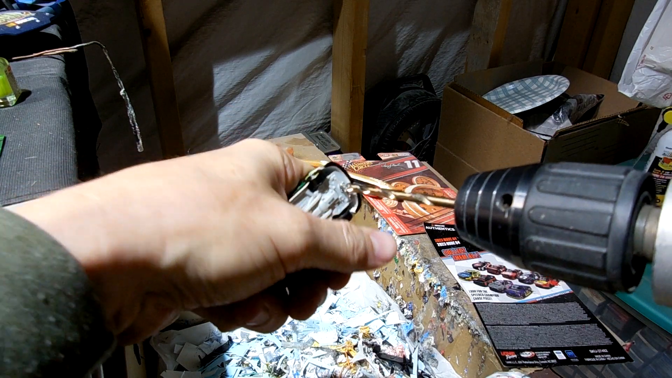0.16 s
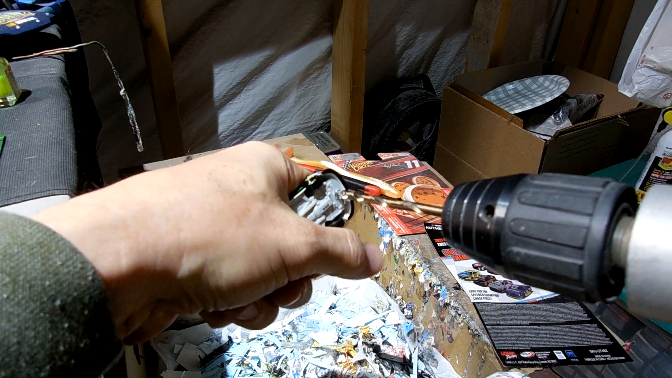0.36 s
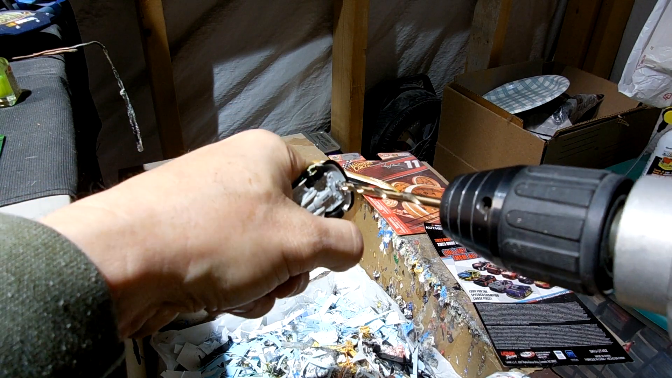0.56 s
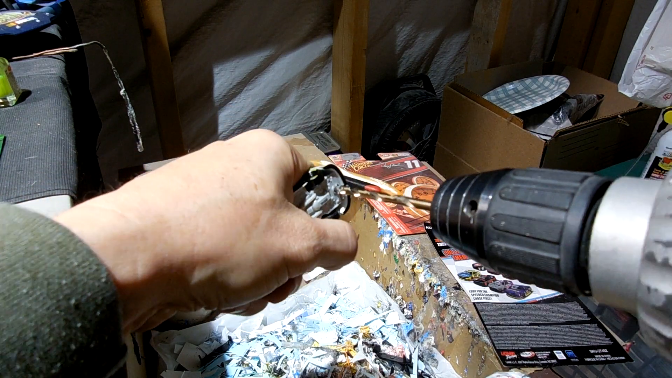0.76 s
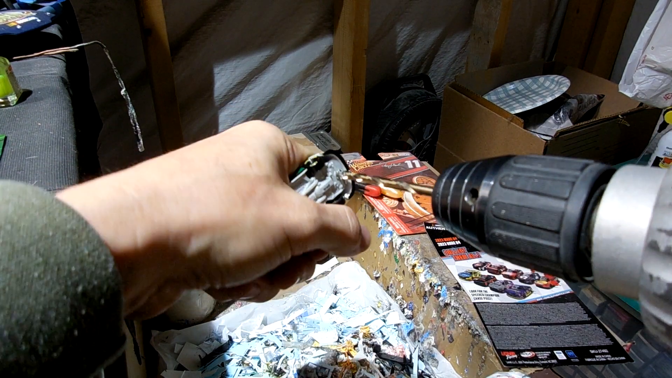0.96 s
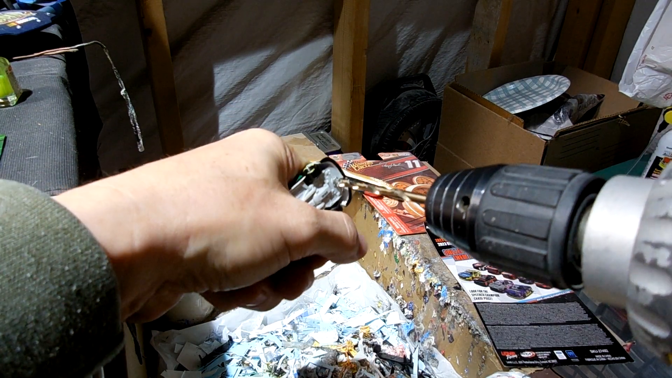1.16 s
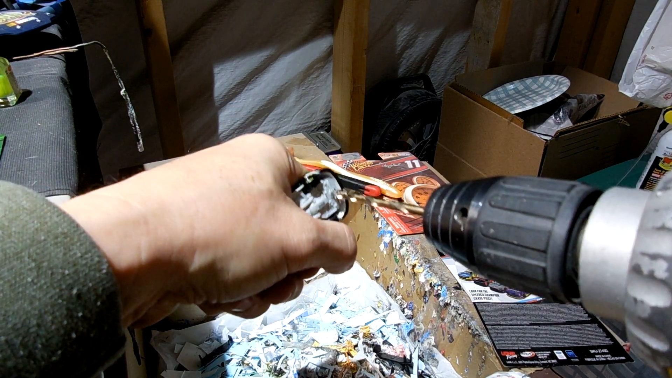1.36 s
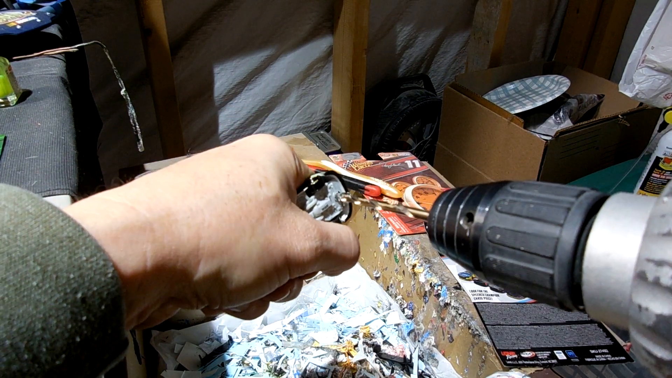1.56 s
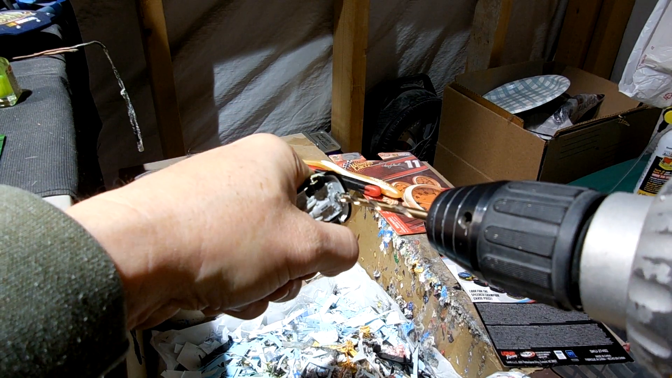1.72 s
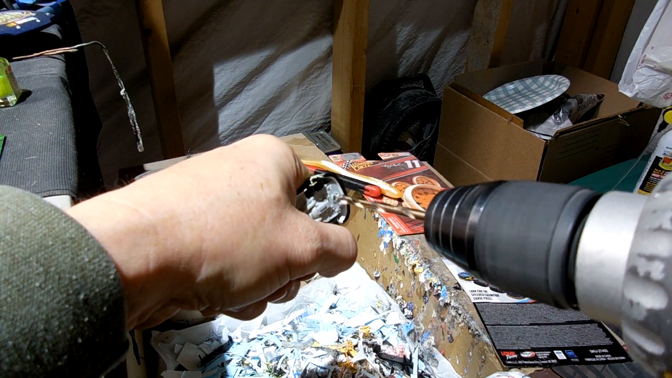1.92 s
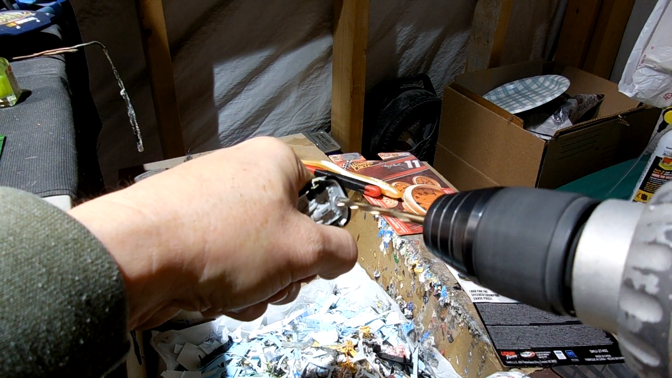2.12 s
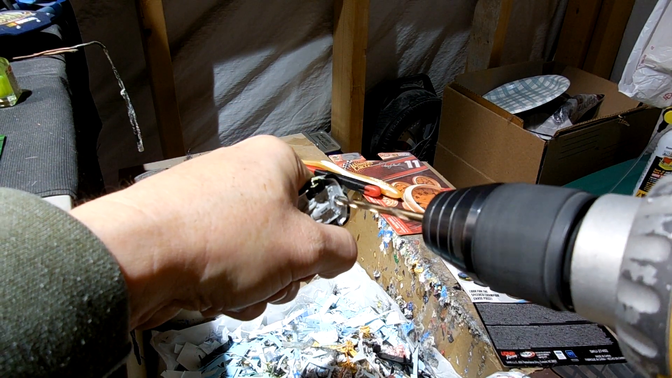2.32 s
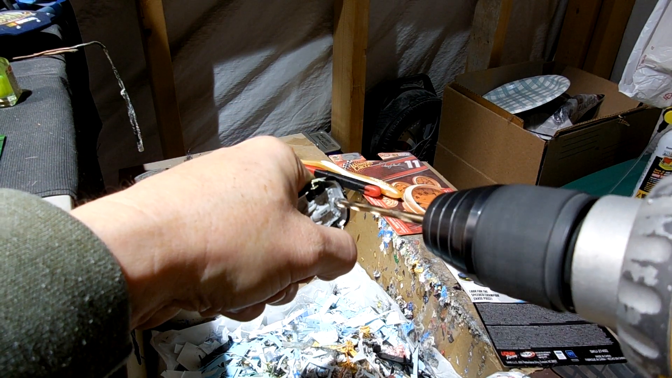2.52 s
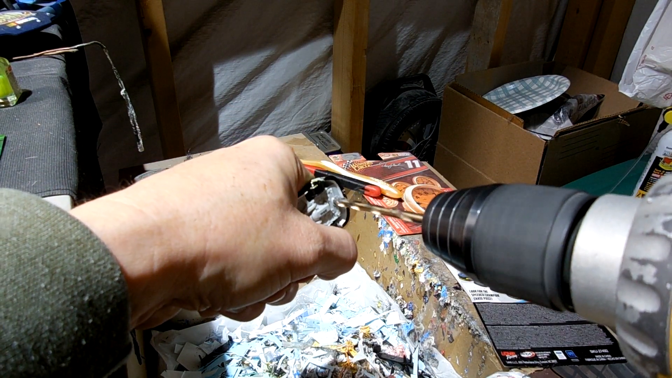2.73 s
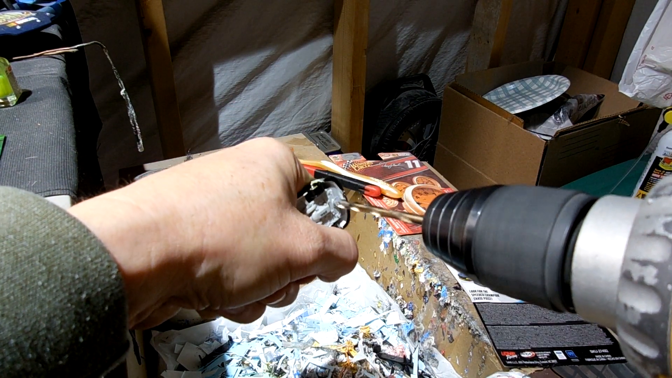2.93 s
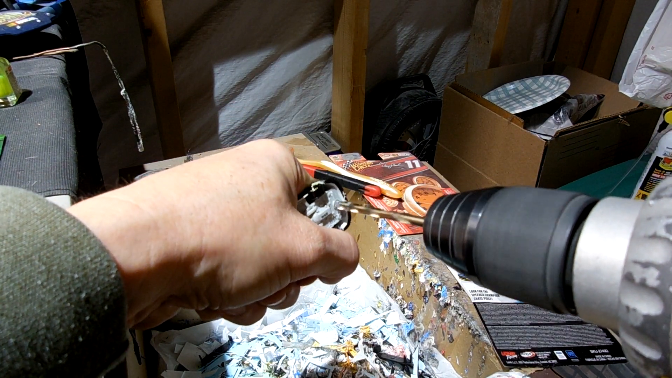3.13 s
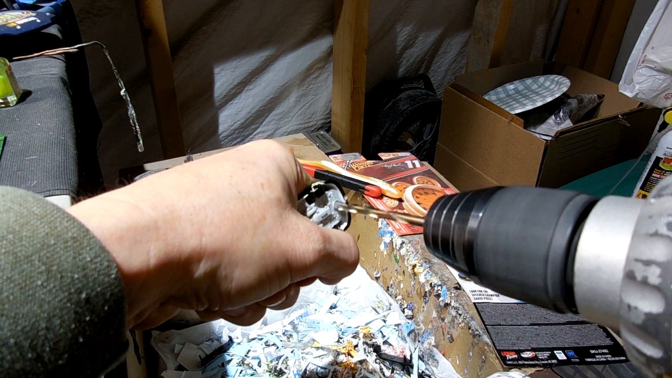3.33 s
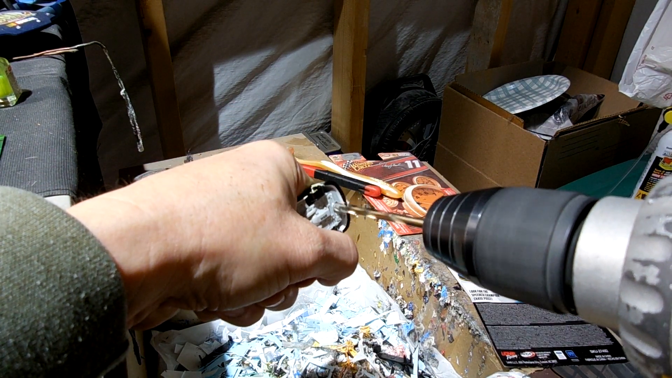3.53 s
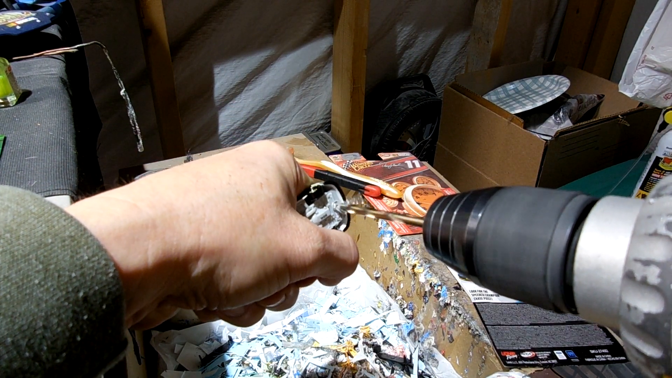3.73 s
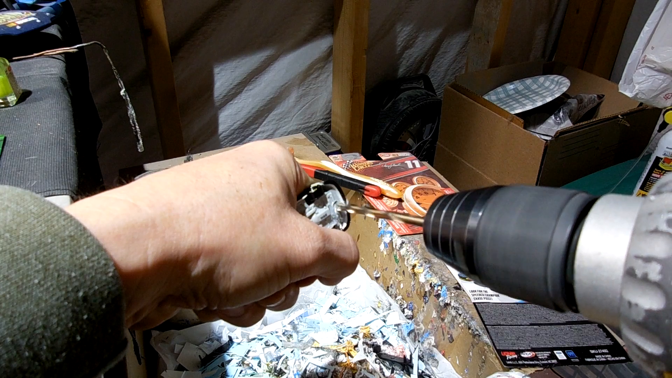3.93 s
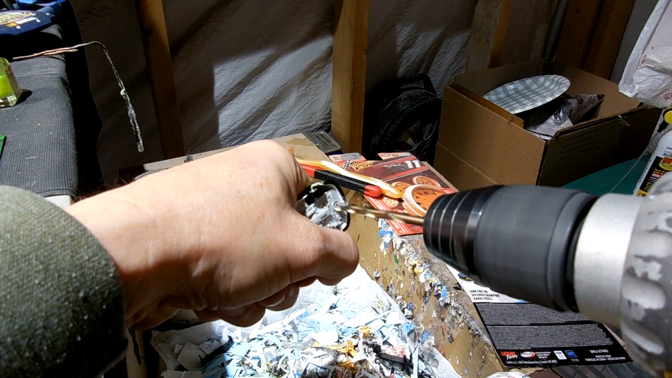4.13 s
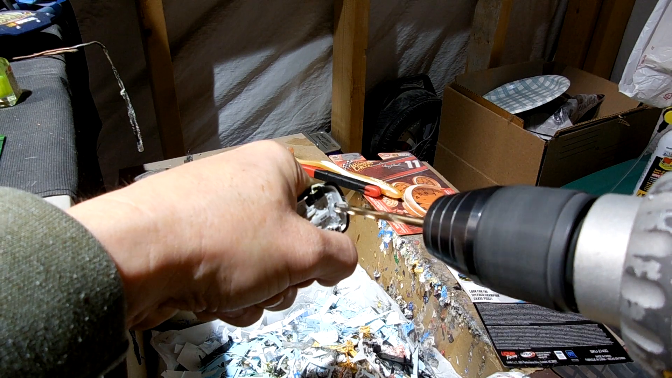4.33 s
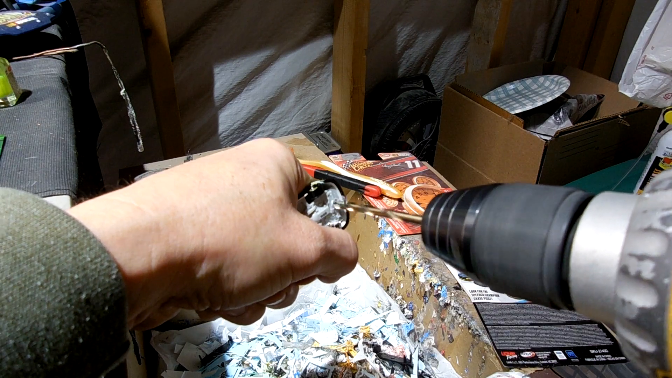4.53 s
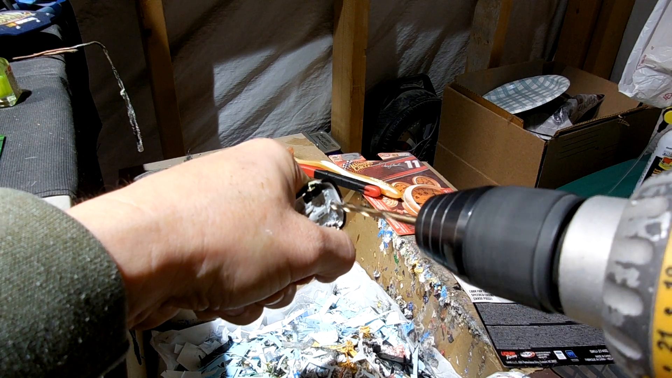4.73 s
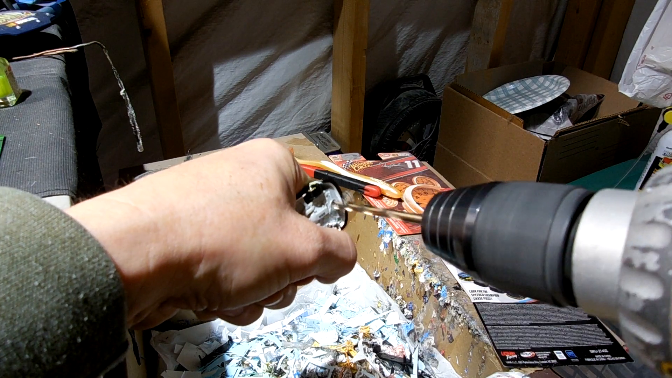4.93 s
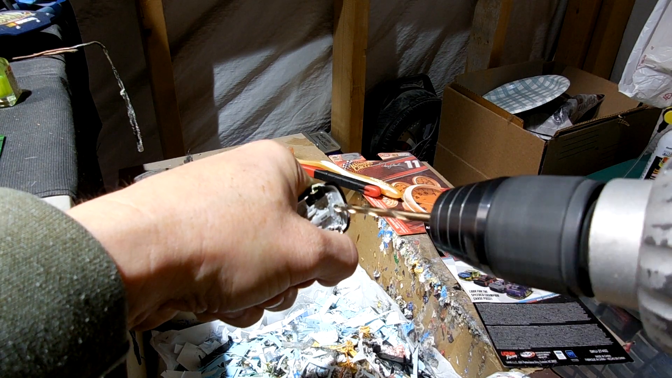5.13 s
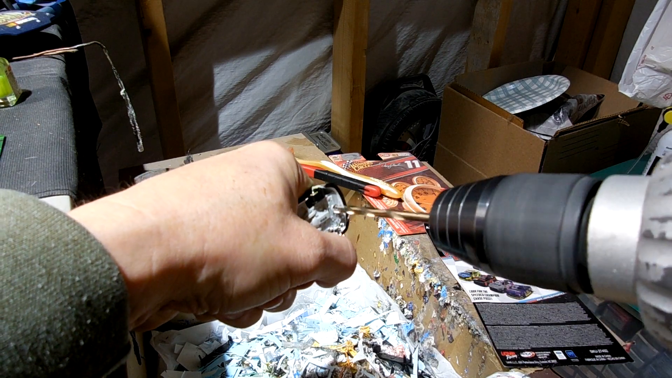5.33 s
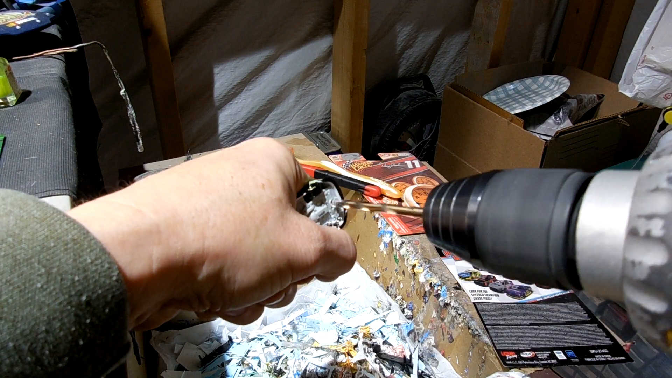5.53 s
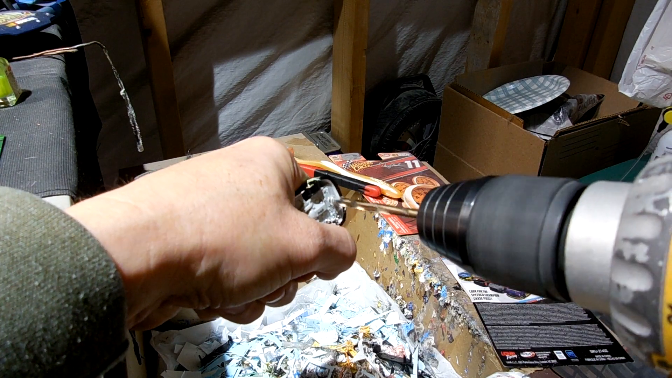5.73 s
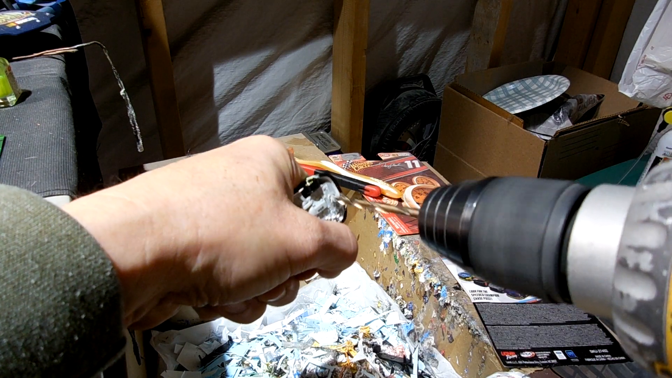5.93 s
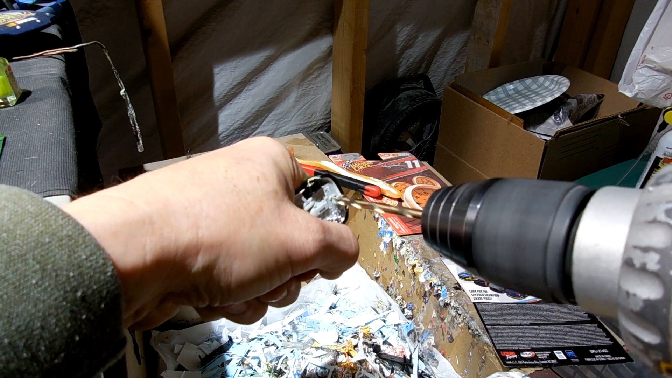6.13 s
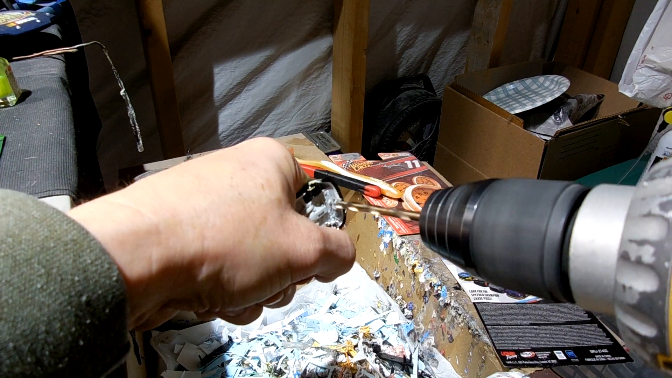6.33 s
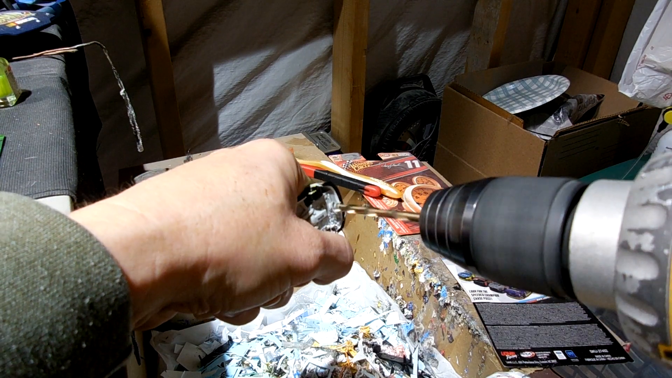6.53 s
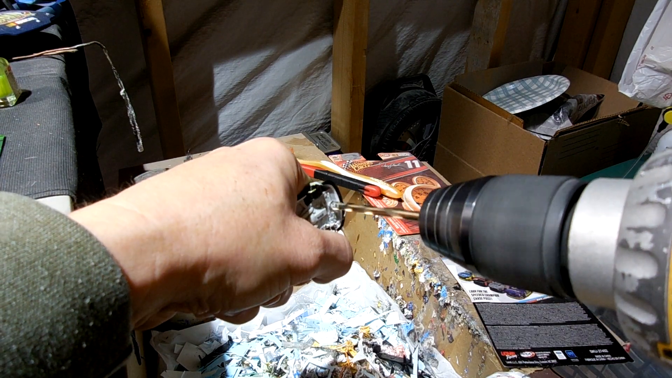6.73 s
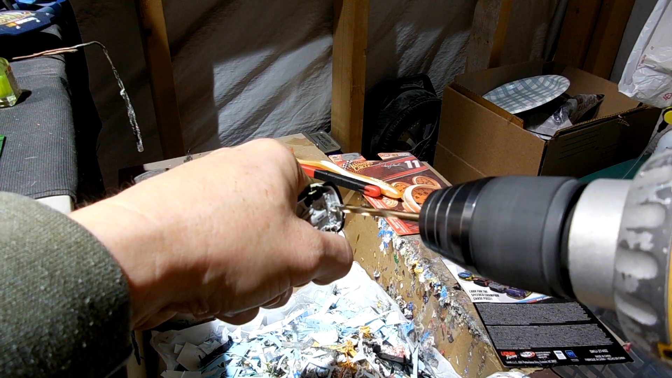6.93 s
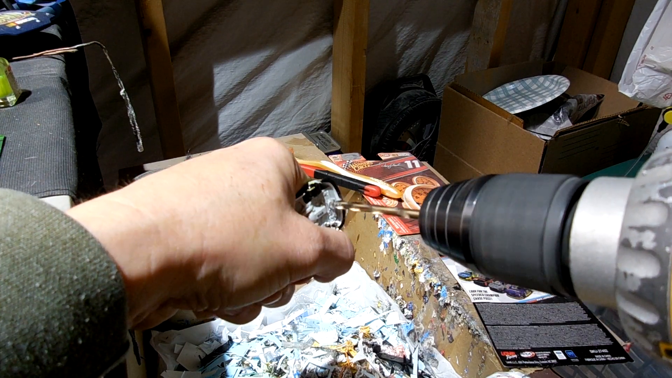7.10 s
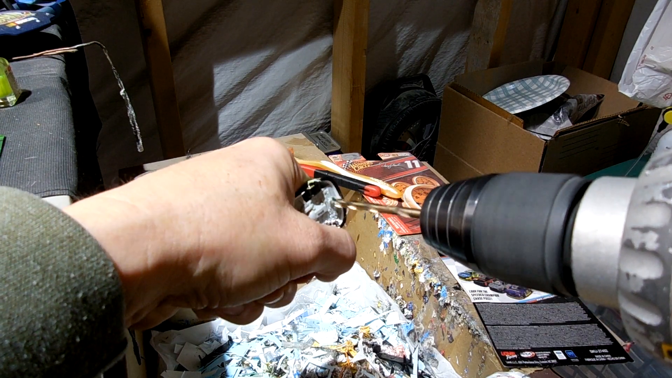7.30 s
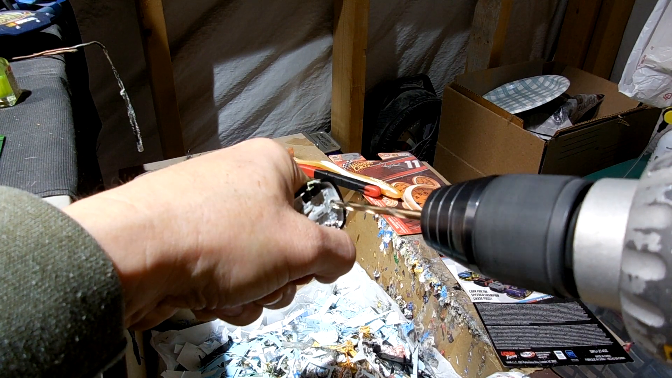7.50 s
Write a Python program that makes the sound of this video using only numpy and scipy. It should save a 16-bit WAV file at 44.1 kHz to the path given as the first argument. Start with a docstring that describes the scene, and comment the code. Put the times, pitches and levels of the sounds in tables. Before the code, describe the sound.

Light clicks and rubs of a handled toy truck, then a cordless drill starts abruptly and bores steadily with a whine and bright hiss.

```python
"""Cordless drill boring a rivet

In a quiet, faintly humming shed a hand shifts a small toy truck: clicks, rubs, scrapes and a thump.
Then a drill, close to a two-port microphone, starts and bores into one of the truck's rivets.
Its motor and gears whine at multiples of the shaft speed, its speed control whistles at a fixed
chopping rate, and its brushes, fan and bit hiss, coloured by the housing and bright at the top."""
import sys
import numpy as np
from scipy import signal
from scipy.fft import rfft, irfft
from scipy.io import wavfile
from scipy.ndimage import uniform_filter1d

SR = 44100
rng = np.random.default_rng(int(sys.argv[2]) if len(sys.argv) > 2 else 0)


def master(y):
    """Save y as 16-bit WAV."""
    cut = np.clip(np.atleast_2d(y).T, -1, 1)
    pcm = np.round(cut * 32767)  # scale
    wavfile.write(sys.argv[1], SR, pcm.astype(np.int16))


N = 333396
T = np.arange(N) / SR
F = np.maximum(np.arange(N // 2 + 1) * SR / N, 1)

# running speed of the motor as the hand presses and eases: (time [s], speed [Hz])
SHAFT_SPEED = [(2.05, 362), (2.26, 408), (2.56, 459), (2.7, 460), (3.31, 421), (3.76, 435), (3.95, 434),
               (4.3, 448), (4.66, 440), (4.96, 436), (5.12, 445), (5.56, 420), (5.84, 427), (6.03, 417),
               (6.48, 418), (7.06, 407), (7.22, 410), (7.56, 406)]
# weaker gear lines: (frequency [cycles per shaft turn])
GEAR_ORDERS = [.141, 1, 1.24, 1.38, 1.53, 1.6, 2, 2.07, 2.25, 2.62, 3.336, 4, 4.15, 4.54, 6, 6.25]
# those lines in a light cut and in a heavy cut: (relative level [dB])
GEAR_LIGHT_DB = [-36, -21, -32, -27, -29, -22, -19, -21, -23, -22, -16, -19, -19, -14, -13, -17]
GEAR_HEAVY_DB = [-40, -28, -36, -30, -30, -33, -19, -24, -23, -26, -30, -27, -27, -24, -17, -18]
# commutator line with sidebands, -3 to +3 chuck rates away: (light cut [dB], heavy cut [dB])
COMMUTATOR_LINES = [(-15, -23), (-11, -22), (-7, -16), (-3, 0), (-4, -11), (-9, -12), (-15, -23)]
# whistle lines: (multiple of chopping rate [1], multiple of shaft speed added [1])
CHOP_LINES = [(1, 0), (1, -1), (1, 2), (2, 0), (2, -1), (2, 1), (2, -3), (3, 0), (4, 0)]
# all of those lines but the first: (level [dB])
CHOP_LINE_DB = [-45, -48, -35.5, -35.5, -44, -45, -47.5, -44]
# the first line, shifting as the drill tilts: (time [s], left level [dB], right level [dB])
WHISTLE_LEVELS = [(2.15, -18, -17), (2.75, -16.5, -17), (3.05, -22, -17.5), (3.35, -17.5, -18),
                  (4.5, -18.7, -18.2), (4.9, -16.5, -18.7), (5.12, -18.5, -19), (5.36, -27, -22.3),
                  (5.55, -25.5, -24), (5.93, -17, -21), (6.2, -17.2, -18.7), (6.45, -18.3, -20.3),
                  (6.8, -20, -23.8), (7.15, -20.3, -24), (7.5, -19.5, -22.5)]
# brushes, fan and bit: (frequency [Hz], relative spectral level [dB])
HISS_SPECTRUM = [(30, -47), (250, -34), (430, -30), (750, -26), (1100, -16), (1300, -7.5), (1500, -13.5),
                 (2200, -18.5), (3700, -11.5), (4300, -15.5), (7700, -16.5), (11500, -19), (14500, -22.5),
                 (16500, -23)]
# peaks in the drill's hiss: housing resonances, plus a lift of the top treble:
# (frequency [Hz], width [Hz], boost [dB])
HISS_PEAKS = [(320, 52, 3.5), (620, 58, 6.5), (876, 104, 5), (1965, 350, 5.5), (2657, 400, 8.5),
              (3260, 400, 3), (5760, 280, 4), (6480, 390, 5), (7900, 750, 0.5), (14200, 1700, 7.5),
              (15600, 620, 5)]
# balance of whine and hiss: (frequency [Hz], left minus right [dB])
DRILL_BALANCE = [(60, 0), (200, -2), (1290, 0), (2100, 2), (2500, -2.5), (3100, -0.5), (4100, -0.5),
                 (5800, 10.5), (7100, 6), (8300, 9), (9700, 4.5), (11500, 3), (13000, 5.5), (15000, -2)]
# hiss common to both ports: (frequency [Hz], share of power [0-1])
COHERENT_SHARE = [(60, .7), (300, .99), (650, .97), (1000, .75), (1300, .95), (2100, .55), (2700, .8),
                  (3050, .3), (3600, .6), (4500, .3), (6500, .55), (7400, .2), (9000, .42), (14000, .45)]
# the bench as the drill starts and the hand leans: (start [s], rise [s], t60 [s], level [dB])
BENCH_RUMBLES = [(2.05, .03, 2.6, -48), (4.9, .2, 3.2, -54)]
# gearbox resonances: (frequency [Hz], t60 [s], level [dB])
GEARBOX_MODES = [(335, .07, -24), (640, .04, -28), (1480, .06, -22), (1900, .04, -26), (3300, .04, -24)]
# knocks on the truck: (time [s], level [dB], snap [Hz], low modes [dB], middle modes [dB],
# high modes [dB], left minus right [dB])
TRUCK_CLICKS = [(0.132, -38, 907, -19, -14, -17, 3.0), (0.265, -32.5, 960, -8, -20, -23, 5.5),
                (0.28, -37, 900, 1, -15, -19, 4.0), (0.312, -31.5, 4670, -20, -13, -20, 4.5),
                (0.359, -43, 1200, -9, -15, -15, 1.5), (0.43, -31.5, 4140, -20, -3, -18, 6),
                (0.845, -30.5, 5200, -19, -10, -9, 9), (0.848, -36, 4940, -13, -14, -16, 5.0),
                (1.238, -49, 1100, -11, -12, -11, 3.0), (1.349, -42, 880, -5, -17, -16, 10),
                (1.438, -22.5, 8150, -35, -27, -2, 7), (1.451, -43, 736, -19, -19, -24, 4.0),
                (1.498, -39, 3900, -18, -8, -21, 11), (1.657, -29.5, 1620, -31, 17, -30, 5.0),
                (1.667, -47, 756, -15, -12, -11, 3.0), (1.714, -42, 1110, -10, -12, -19, 1.5),
                (1.756, -54, 732, -15, -17, -14, 1.5), (1.808, -30.5, 3400, -18, -2, -23, 6),
                (1.919, -29.5, 1540, -39, 6, -8, 5)]
# truck resonances: (frequency [Hz], t60 [s])
TRUCK_MODES = [(900, .018), (1500, .018), (2400, .02), (3400, .012), (4700, .012), (5600, .008),
               (6900, .006), (8400, .008), (10500, .005)]
# strokes of skin and sleeve: (start [s], rise [s], hold [s], fall [s], level [dB])
RUB_STROKES = [(.22, .06, .01, .1, -53), (.58, .04, .2, .05, -58), (.8, .1, .25, .025, -49.5),
               (1.2, .2, .01, .1, -54), (1.45, .05, .22, .06, -60)]
# their friction noise: (frequency [Hz], relative spectral level [dB])
RUB_SPECTRUM = [(470, -44), (800, -12), (1110, -6), (1260, -12), (1440, -6), (2900, -1.5), (11000, -12.5),
                (15000, -28)]
# short scrapes: (centre time [s], 1/e half-width [s], level [dB])
SCRAPE_STROKES = [(.665, .02, -52), (0.736, 0.021, -50.5)]
# resonances they excite: (frequency [Hz], width [Hz], relative level [dB])
SCRAPE_MODES = [(2000, 250, 0), (2450, 250, 0), (3330, 200, 2), (4900, 400, -6)]
# thump through the bench: (start [s], frequency [Hz], rise [s], t60 [s], level [dB])
THUMP_MODES = [(.966, 300, .008, .07, -32), (.978, 135, .004, .25, -35), (.985, 45, .01, .5, -41)]
# air and microphone hiss: (frequency [Hz], relative spectral level [dB])
SHED_SPECTRUM = [(12, -30), (20, 1), (146, -7), (270, -12.5), (357, -4.5), (422, -13.5), (527, -12.5),
                 (1090, -15.5), (1570, -17), (3250, -23), (4420, -22.5), (12800, -23), (16000, -26)]
# faint hums: (frequency [Hz], level [dB])
HUM_TONES = [(368, -70), (158, -68), (740, -74), (1112, -70), (61, -68.5)]
# when each hum sounds: (start [s], end [s])
HUM_TIMES = [(0, 7.56), (.62, 1.02), (1.07, 2.0), (1.07, 2.0), (2.1, 7.56)]

CONTACT_S, TRIGGER_S = 2.053, 2.059  # current flows, the switch snaps shut
ENGAGE_S, KNOCK_S = 2.068, 2.07  # the gears take up their play and slam into mesh
GEAR_RATIO, CHOP_HZ = 15.1, 3924.4  # motor turns per chuck turn; chopping rate
LEFT_LAG_S = 4 / SR  # the drill is on the right
STEP = 16  # samples per coarse control value


def drill():
    """A motor nears its running speed exponentially; the shaft angle sets the phase of the whine."""
    running_hz = curves(SHAFT_SPEED)[0]
    spin = 1 - np.exp(-np.maximum(T - CONTACT_S, 0) / .027)
    turns = np.cumsum(running_hz * spin) / SR
    bite = .12 + .88 * ramp(5.0, .35)  # 0 is a light cut, 1 a heavy one
    stalled = 1 - ramp(ENGAGE_S, .012)
    # the whine is louder when load slows the shaft and the bit bites
    whine_db = -25.5 - .13 * np.maximum(running_hz - 415, 0) + 2.5 * bite
    whine = undb(whine_db) * spin ** 3 * gear_whine(turns, bite[::STEP])
    digging_in = np.exp(-((T - 5.4) / .3) ** 2)
    noise = undb(-21.4 + 1.5 * digging_in) * hiss(turns)
    body = two_ports(noise[0], noise[1:], whine) * undb(-11 * stalled) + bench_rumble()
    return ramp(CONTACT_S, .003) * (body + undb(-14 * stalled) * chopper_whistle(turns))


def gear_whine(turns, bite):
    """Modulation: the wobbling chuck splits the commutator tone, three cycles a turn, into sidebands."""
    slack = 1 - .65 * bite  # a loaded gear train runs steadier
    lines = 0
    for sideband, (light, heavy) in enumerate(COMMUTATOR_LINES, -3):
        order = 3 + sideband / GEAR_RATIO
        lines += shaft_tone(turns * order, light + (heavy - light) * bite, 3 * slack, slack)
    for order, light, heavy in zip(GEAR_ORDERS, GEAR_LIGHT_DB, GEAR_HEAVY_DB):
        lines += shaft_tone(turns * order, light + (heavy - light) * bite, 1.8, .9)
    phase = 2 * np.pi * 3 * turns
    noise_skirt = wander(260) * np.cos(phase) + wander(260) * np.sin(phase)
    return lines + hold(undb(-13 - 9 * bite)) * noise_skirt


def shaft_tone(cycles, db, sway_db, drift_rad):
    """Random amplitude and phase modulation broaden a line locked to the shaft."""
    amplitude = hold(np.sqrt(2) * undb(db + sway_db * coarse_wander(11)))
    return amplitude * np.cos(2 * np.pi * cycles + hold(drift_rad * coarse_wander(14)))


def chopper_whistle(turns):
    """Forced vibration: chopped current drives the windings, and the turning rotor adds sidebands."""
    left_db, right_db = curves(WHISTLE_LEVELS)
    # the left port lags more as the whistle turns from the right one
    lag_s = (.06 - .004 * (right_db + 18)) / 1000
    cycles = CHOP_HZ * (T - np.array([lag_s, np.zeros(N)])) + .12 * wander(3)
    out = undb(np.array([left_db, right_db]) + .57 * wander(25)) * np.cos(2 * np.pi * cycles)
    # the fainter lines keep a fixed lag, flutter and favour the left port
    faint_cycles = cycles[1] - CHOP_HZ * np.array([[LEFT_LAG_S], [0]])
    for (harmonic, sideband), db in zip(CHOP_LINES[1:], CHOP_LINE_DB):
        flutter = np.array([hold(undb(db + 2 * coarse_wander(12))) for port in "LR"])
        out += pan(6) * flutter * np.cos(2 * np.pi * (harmonic * faint_cycles + sideband * turns))
    return np.sqrt(2) * out


def hiss(turns):
    """Source and filter: ticks of brushes, fan and bit, coloured by the housing, top treble lifted."""
    colour = undb(spectrum(HISS_SPECTRUM) + peaks(HISS_PEAKS))
    ticks = rng.standard_normal((3, N)) * undb(.8 * rng.exponential(size=(3, N)))
    coloured = rfft(ticks) * colour
    treble = 1 / (1 + (5500 / F) ** 8)
    # grind and airy top pulse with the chuck but flicker apart
    chuck = np.cos(2 * np.pi * turns / GEAR_RATIO + wander(3))
    grind = irfft(coloured * np.sqrt(1 - treble), N) * undb(.5 * wander(20) + .72 * chuck)
    air = irfft(np.roll(coloured, 1, axis=0) * np.sqrt(treble), N) * undb(.7 * wander(30) + .71 * chuck)
    upper_share = np.sum(colour[F > 4300] ** 2) / np.sum(colour ** 2)
    return unit_rms(grind + air) / np.sqrt(upper_share)  # rms near 1 above 4300 Hz


def two_ports(direct, diffuse, tones):
    """Path difference: direct noise and tones reach the left port later; diffuse noise is incoherent."""
    share = np.clip(spectrum(COHERENT_SHARE), 0, 1)
    delay = np.array([np.exp(-2j * np.pi * F * LEFT_LAG_S), np.ones(len(F))])
    coherent = np.sqrt(share) * rfft(direct) + rfft(tones)
    incoherent = np.sqrt(1 - share) * rfft(diffuse)
    return irfft(pan(spectrum(DRILL_BALANCE)) * (delay * coherent + incoherent), N)


def bench_rumble():
    """Structure-borne sound: the drill and the leaning hand excite low resonances of the bench."""
    modes = peaks([(40, 43, .83), (150, 69, .31), (323, 72, 1)])
    rumble = shaped(rng.standard_normal(N), modes)
    envelope = undb(-73)
    for start, rise, t60, db in BENCH_RUMBLES:
        envelope += undb(db) * ramp(start, rise) * decay(np.maximum(T - start - rise, 0), t60)
    return rumble * envelope * undb(4.6 * wander(11))


def trigger_snap():
    """Impact: the closing switch excites two bright, heavily damped resonances of the plastic."""
    t = np.maximum(T - TRIGGER_S, 0)
    snap = shaped(rng.standard_normal((2, N)), peaks([(7200, 2200, 1), (3000, 1200, .5)]))
    return undb(-12.5) * snap * (1 - np.exp(-t / .001)) * np.exp(-t / .005)


def gearbox_knock():
    """Free vibration: the gearbox rings dully after the teeth meet."""
    return sum(undb(db) * struck_mode(KNOCK_S, hz, .006, t60, .8 * wander(60))
               for hz, t60, db in GEARBOX_MODES)


def truck_clicks():
    """Modal superposition: each knock rings the truck's modes, with its own snap and a noise burst."""
    out, t = np.zeros((2, N)), np.arange(3000) / SR
    mode_hz, t60 = np.transpose(TRUCK_MODES)
    scatter = rng.standard_normal((len(TRUCK_CLICKS), len(TRUCK_MODES), 2))
    for (start, db, snap_hz, *band_db, pan_db), offsets in zip(TRUCK_CLICKS, scatter):
        gains = undb(np.interp(mode_hz, [1800, 4000, 8000], band_db) + 2 * offsets[:, 0])
        detuned_hz = mode_hz * (1 + .099 * offsets[:, 1])
        ring = gains @ (np.sin(2 * np.pi * detuned_hz[:, None] * t) * decay(t, t60[:, None]))
        snap = .5 * np.sin(2 * np.pi * snap_hz * t) * decay(t, 35 / snap_hz)
        burst = .18 * rng.standard_normal(len(t)) * np.exp(-t / .0055)
        i = int(start * SR)
        out[:, i:i + len(t)] += undb(db - 1) * pan(pan_db) * (ring / np.max(abs(ring)) + snap + burst)
    return out


def rubs():
    """Sliding friction: skin and sleeve give broadband noise during each stroke."""
    port_mix = np.array([[1, .98], [1, -.67]])
    friction = shaped(port_mix @ rng.standard_normal((2, N)), undb(spectrum(RUB_SPECTRUM)))
    strokes = sum(undb(db) * ramp(start, rise) * (1 - ramp(start + rise + dwell, fall))
                  for start, rise, dwell, fall, db in RUB_STROKES)
    return pan(4.7) * friction * strokes * undb(1.1 * wander(59.6))


def scrapes():
    """Resonance: two brief scrapes ring in a few narrow bands."""
    modes = peaks([(hz, width, undb(db)) for hz, width, db in SCRAPE_MODES])
    strokes = sum(undb(db) * np.exp(-((T - centre) / width) ** 2) for centre, width, db in SCRAPE_STROKES)
    return pan(4.7) * shaped(rng.standard_normal(N), modes) * strokes


def bench_thump():
    """Damped vibration: a bump rings the bench in three modes, each lower and longer than the last."""
    return pan(9.1) * sum(undb(db) * struck_mode(start, hz, rise, t60, .5 * wander(40.5))
                          for start, hz, rise, t60, db in THUMP_MODES)


def shed():
    """Noise floor: quiet air and microphone hiss, with a few wavering hums."""
    port_mix = np.array([[1, .57], [1, -.75]])
    air = shaped(port_mix @ rng.standard_normal((2, N)), undb(spectrum(SHED_SPECTRUM)))
    air *= undb(-54.5 + wander(2.44))
    hum = 0
    for (hz, db), (start, end) in zip(HUM_TONES, HUM_TIMES):
        fade = np.clip(np.minimum(T - start, end - T) / .06, 0, 1)
        hum += fade * undb(db + 2.5 * wander(9)) * np.sin(2 * np.pi * hz * T + .9 * wander(12))
    return pan(2.1) * (air + hum)


def struck_mode(start, hz, rise, t60, phase):
    """A damped oscillator that builds up and dies away."""
    t = np.maximum(T - start, 0)
    return np.sin(2 * np.pi * hz * t + phase) * (1 - np.exp(-t / rise)) * decay(t, t60)


def decay(t, t60):
    """Exponential damping, 60 dB in t60 seconds."""
    return 1000 ** (-t / t60)


def ramp(start, length):
    """Linear rise from 0 to 1."""
    return np.clip((T - start) / length, 0, 1)


def undb(db):
    """Level to amplitude ratio."""
    return 10 ** (np.asarray(db) / 20)


def pan(db):
    """Left and right gains for a level difference."""
    return undb(np.vstack([db, -db]) / 2)


def curves(rows):
    """Columns of a time table, interpolated to every sample."""
    times, *columns = np.transpose(rows)
    return [np.interp(T, times, column) for column in columns]


def spectrum(rows):
    """A table interpolated over log frequency."""
    hz, values = np.transpose(rows)
    return np.interp(np.log(F), np.log(hz + 1), values)


def peaks(rows):
    """Sum of Lorentzian peaks: (frequency [Hz], width [Hz], height)."""
    return sum(height / (1 + (2 * (F - hz) / width) ** 2) for hz, width, height in rows)


def unit_rms(x):
    """Scaling to rms 1."""
    return x / np.sqrt(np.mean(x ** 2))


def shaped(noise, response):
    """Linear filtering of noise, scaled to rms 1."""
    return unit_rms(irfft(rfft(noise) * response, N))


def coarse_wander(rate_hz):
    """Smooth random motion of spread near 1, one value every STEP samples."""
    t = T[::STEP] * rate_hz
    knots = rng.standard_normal(int(t[-1]) + 2)
    path = np.interp(t, np.arange(len(knots)), knots)
    return 1.3 * uniform_filter1d(path, int(SR / rate_hz / (2 * STEP)))


def hold(x):
    """Zero-order hold of coarse values."""
    return np.repeat(x, STEP)[:N]


def wander(rate_hz):
    """Smooth random motion at every sample."""
    return hold(coarse_wander(rate_hz))


def scene():
    """Superposition: the pressures from drill, hand and shed add."""
    return (drill() + trigger_snap() + truck_clicks() + rubs() + scrapes() + bench_thump()
            + shed() + gearbox_knock())


def record(dry):
    """Band limiting: a steep elliptic low-pass removes the top treble."""
    return signal.sosfilt(signal.ellip(16, .3, 75, 15760, fs=SR, output="sos"), dry)


dry = scene()
out = record(dry)
master(out)
```